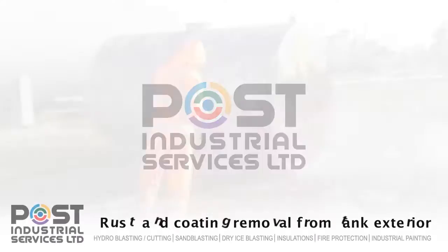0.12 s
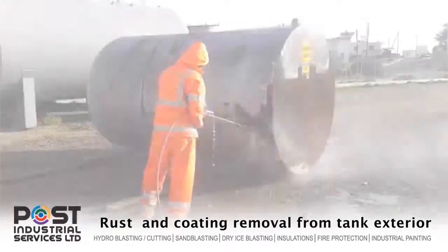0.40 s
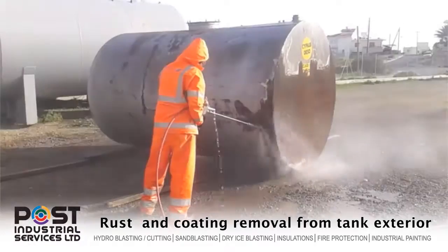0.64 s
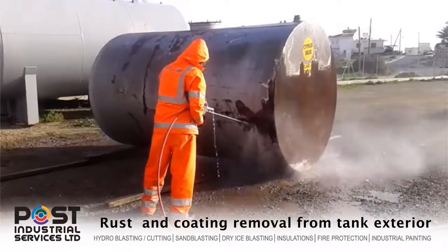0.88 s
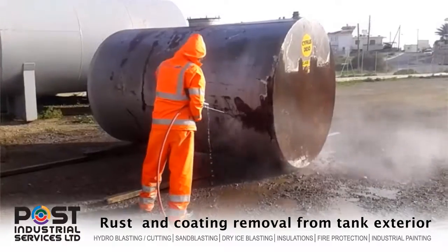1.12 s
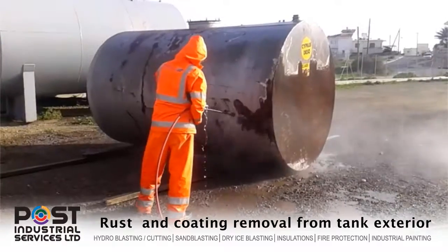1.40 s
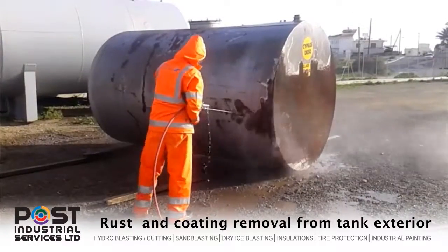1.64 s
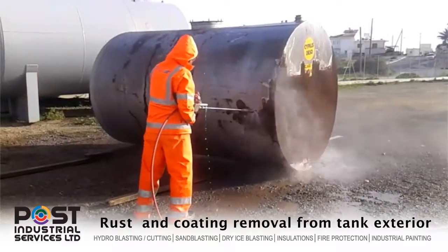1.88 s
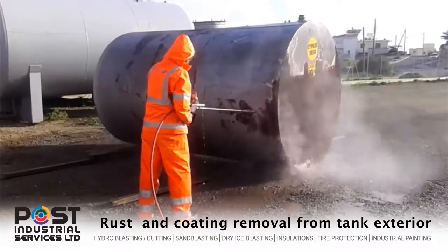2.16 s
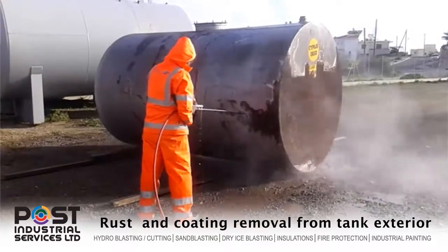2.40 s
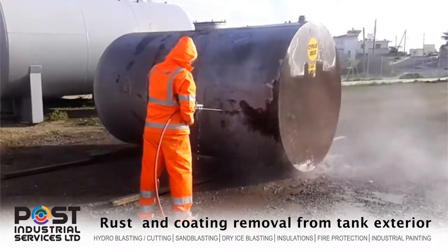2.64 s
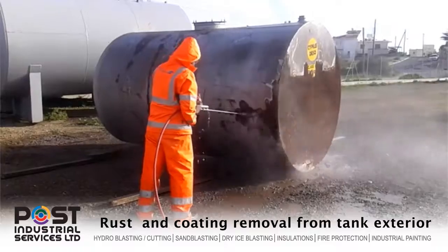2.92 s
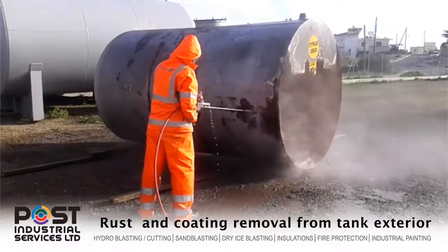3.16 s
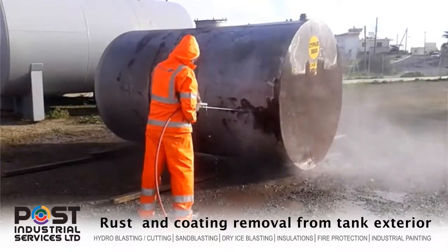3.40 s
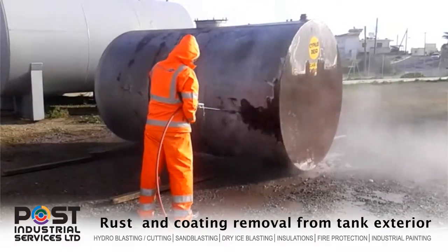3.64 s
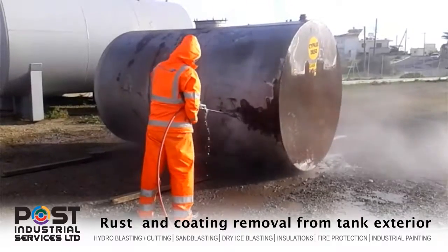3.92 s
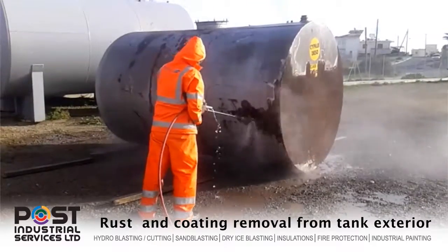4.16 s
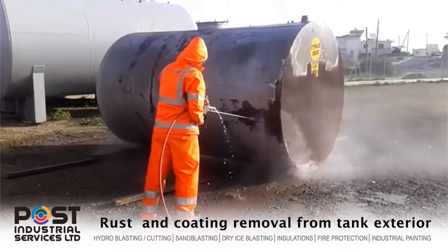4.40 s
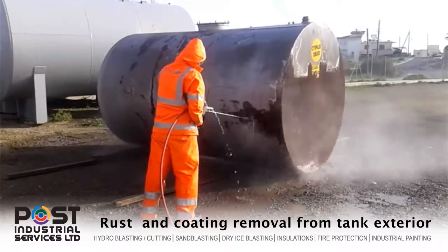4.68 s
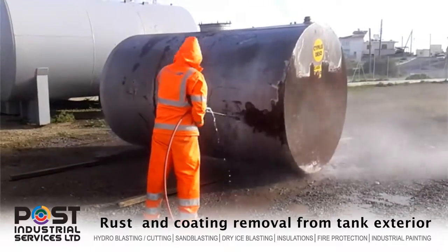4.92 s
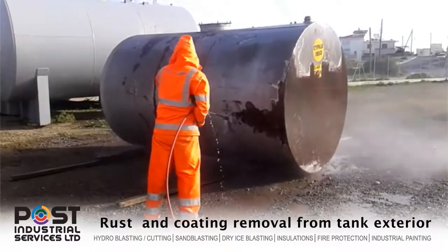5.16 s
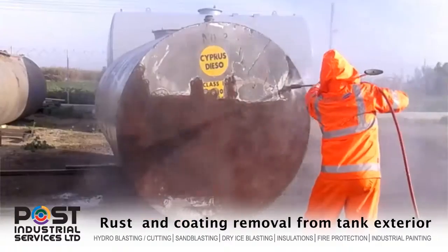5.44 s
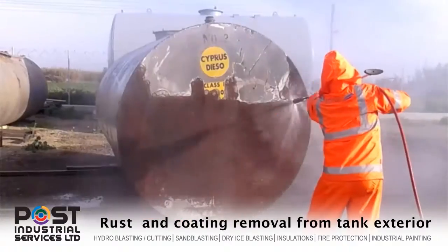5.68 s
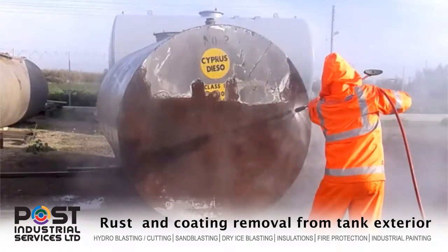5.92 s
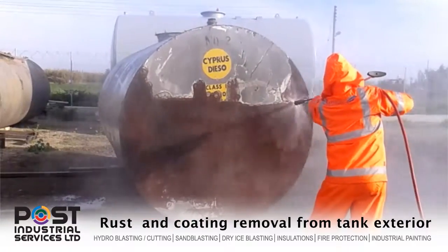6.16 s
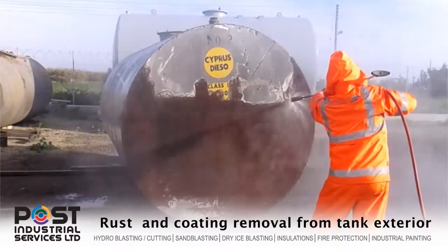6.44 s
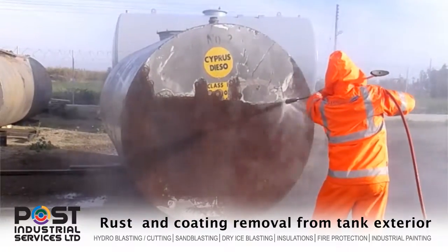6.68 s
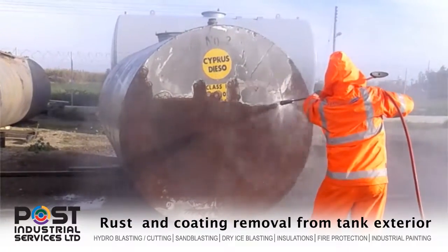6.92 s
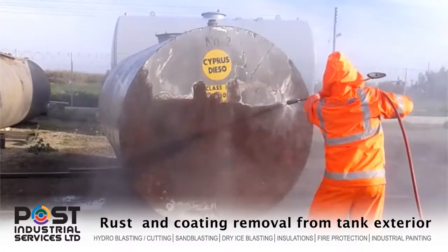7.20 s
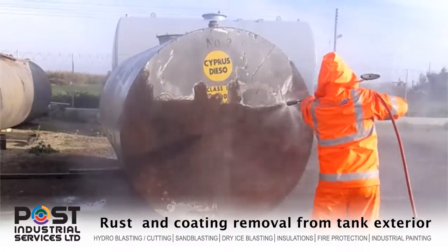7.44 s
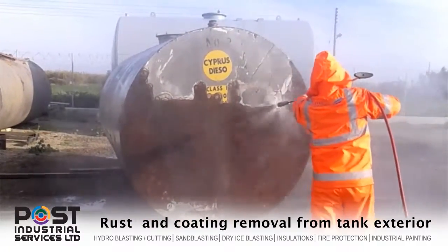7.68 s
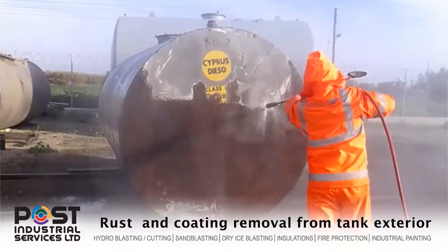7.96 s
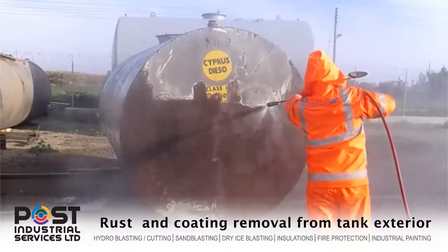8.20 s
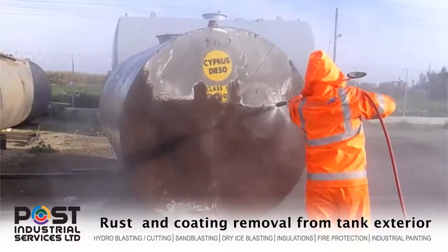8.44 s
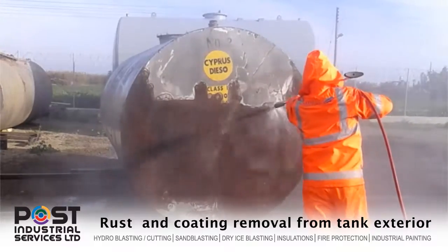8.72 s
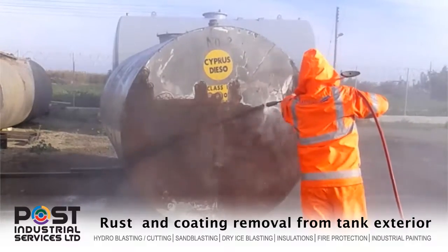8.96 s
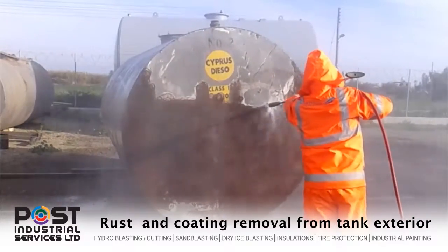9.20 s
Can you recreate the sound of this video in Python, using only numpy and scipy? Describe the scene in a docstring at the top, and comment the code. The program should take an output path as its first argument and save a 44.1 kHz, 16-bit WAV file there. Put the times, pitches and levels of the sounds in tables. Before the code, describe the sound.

After brief silence, a high-pressure water jet fades in, hissing and fluttering against a hollow steel tank, then cuts to a closer, brighter steady blast.

```python
"""After a short silence a water jet from a spinning nozzle fades in, stripping a hollow steel tank outdoors.
Filtered noise makes the hiss, drumming, roar and spray; all throb at the turning rate and wall modes ring.
A distant pump engine hums in harmonics alongside, and a decaying sine thuds on the shell.
After a short gap a second standpoint follows, with another thud at its start and a faint ground echo
that ripples the colour. Both channels are alike."""
import sys
import numpy as np
from scipy import signal
from scipy.fft import rfft, irfft, next_fast_len
from scipy.io import wavfile
from scipy.ndimage import map_coordinates

SR = 44100
rng = np.random.default_rng(int(sys.argv[2]) if len(sys.argv) > 2 else 0)


def store_wav(level_fs):
    """Save 16-bit WAV to argv[1]."""
    pcm = np.round(np.clip(np.atleast_2d(level_fs), -1, 1) * 32767)
    wavfile.write(sys.argv[1], SR, pcm.T.astype(np.int16))


def attenuation_scalar(level_db):
    """Turn a level in dB into a linear amplitude multiplier (20 dB per decade)."""
    decades = np.asarray(level_db, float) / 20
    return 10 ** decades


N = 411453


def in_time(rows, t):
    """Linear interpolation: the columns of a table joined by straight lines in time."""
    s, *columns = np.transpose(rows)
    return [np.interp(t, s, c) for c in columns]


def at_hz(points, hz):
    """Logarithmic pitch scale: a spectrum interpolated over log frequency."""
    f, value = np.transpose(points)
    return np.interp(np.log(hz), np.log(f), value)


def drift(rate_hz, size):
    """Low-passed random process: coarse noise through a double one-pole filter, scaled to spread 1."""
    step = 40   # samples between coarse points
    settling = 2000   # coarse points discarded while the filter settles
    r = np.exp(-2 * np.pi * rate_hz * step / SR)
    coarse = rng.standard_normal(size // step + settling + 2)
    slow = signal.lfilter([1], [1, -2 * r, r * r], coarse)[settling:]
    return np.interp(np.arange(size) / step, np.arange(len(slow)), slow / slow.std())


def throb(turns, second, lag):
    """Periodic modulation: one hump for the turn and a smaller second harmonic for the opposite jet."""
    return np.cos(2 * np.pi * turns - lag) + second * np.cos(4 * np.pi * turns - 2 * lag)


# Borders between the seven layers of the jet sound, rising: f/Hz
LAYER_EDGES_HZ = [110, 500, 1400, 2850, 4500, 9000]


def throbbing_layers(noise, hz, turns, size, depth, second, surge_db, near_db, own_db):
    """Amplitude-modulated turbulence: third-octave noise bands throb and flicker, then sum into layers."""
    length = len(turns)
    grip = 1 + 0.28 * drift(1.9, length)   # the depth of the throb wavers slowly
    surge, near = drift(21.0, length), drift(14.0, length)
    layers = np.zeros((len(LAYER_EDGES_HZ) + 1, length))
    for centre_hz in 25 * 2 ** (np.arange(29) / 3):
        away = np.clip(3 * np.log2(hz / centre_hz), -1, 1)   # third octaves from the centre
        band = irfft(noise * np.cos(np.pi / 2 * away) ** 2, size)[:length]
        near = 0.73 * near + 0.31 * drift(27.0, length)   # neighbouring bands flicker partly alike
        lag = 0.88 * drift(0.78, length)   # each band peaks at its own angle of the nozzle
        swing_db = at_hz(depth, centre_hz) * grip * throb(turns, second, lag)
        swing_db += surge_db * surge + near_db * near + own_db * drift(46.0, length)
        layers[np.searchsorted(LAYER_EDGES_HZ, centre_hz)] += band * attenuation_scalar(swing_db)
    return layers


def ring_wall(layers, noise, hz, turns, size, ring, levels_db, shares, ring_swing_db, ring_follows):
    """Modal resonance: narrow bands of the driving noise are raised; each mode favours its own jet angle."""
    length = len(turns)
    for ring_hz, width_hz, lift_db in ring:
        mode = irfft(noise * np.exp(-2 * ((hz - ring_hz) / width_hz) ** 2), size)[:length]
        angle = 2 * np.pi * (turns + rng.random()) + drift(0.85, length)
        gain_db = lift_db + ring_swing_db * np.cos(angle)
        gain_db += 0.51 * drift(2.0, length) + 0.71 * drift(22.0, length)
        layer = np.searchsorted(LAYER_EDGES_HZ, ring_hz)
        # the harder driven, the more it rings
        gain_db += ring_follows * (levels_db[layer] - shares[layer][0])
        layers[layer] += mode * (attenuation_scalar(gain_db) - 1)


def layer_levels(sweep, shares, t):
    """Linear superposition in dB: each layer follows the bite and the splash by its own shares."""
    bite_db, splash_db = in_time(sweep, t)
    return [db + by_bite * bite_db + by_splash * splash_db for db, by_bite, by_splash in shares]


def with_echoes(x, turns, echoes):
    """Comb interference: path lengths change as the jet circles and the lance moves, so the comb slides."""
    at, out = np.arange(len(x)), x.copy()
    for lag_s, db, sweep_s, wander_s in echoes:
        angle = 2 * np.pi * (turns + rng.random())
        late = lag_s + sweep_s * np.cos(angle) + wander_s * drift(0.95, len(x))
        out += attenuation_scalar(db) * map_coordinates(x, [at - late * SR], order=3, mode="mirror")
    # scaled for the summed power of all paths
    return out / np.sqrt(1 + sum(attenuation_scalar(2 * row[1]) for row in echoes))


def blast(span_s, sweep, shares, colour, spin, depth, ring, echoes,
          ring_swing_db, second, surge_db, near_db, own_db, ring_follows):
    """Broadband turbulence of a jet on steel: coloured noise, modulated by rotation and by wall resonance."""
    start, stop = round(span_s[0] * SR), min(round(span_s[1] * SR), N)
    t, size = np.arange(start, stop) / SR, next_fast_len(stop - start)
    hz = np.maximum(np.arange(size // 2 + 1) * SR / size, 1)
    noise = rfft(rng.standard_normal(size)) * attenuation_scalar(at_hz(colour, hz))
    turns_per_s, = in_time(spin, t)
    turns = np.cumsum(turns_per_s) / SR
    layers = throbbing_layers(noise, hz, turns, size, depth, second, surge_db, near_db, own_db)
    levels_db = layer_levels(sweep, shares, t)
    ring_wall(layers, noise, hz, turns, size, ring, levels_db, shares, ring_swing_db, ring_follows)
    direct = sum(attenuation_scalar(db) * x / x.std() for db, x in zip(levels_db, layers))
    out = np.zeros(N)
    out[start:stop] = with_echoes(direct, turns, echoes)
    return out


SIDE_START_S = .7975
# Noise colour, relative within each layer: f/Hz, spectral level/(dB per Hz)
SIDE_COLOUR = [(20, -50), (60, -8.5), (135, -7), (622, -4), (760, -1), (1040, -4.5), (2300, -5),
               (2880, -10.5), (3860, -0.5), (4930, -6.5), (5650, -3), (8900, -3), (11500, -12.5),
               (14400, -19.5), (15800, -22)]
# Nozzle speed: t/s, rate/(turns per s)
SIDE_SPIN = [(.8, 12.3), (1.5, 12.8), (2.2, 19), (2.6, 22.8), (3.0, 19.6), (3.5, 17), (4.0, 12),
             (4.5, 14.3), (5.4, 12.5)]
# Throb depth, before its slow waver: f/Hz, swing/dB
SIDE_THROB = [(100, 2), (800, 1.94), (3000, 1.2), (6000, 1.64), (12000, 1.3)]
# Ringing modes of the steel wall, lift before modulation: f/Hz, width/Hz, lift/dB
SIDE_RING = [(1254, 190, 3), (2170, 300, 1.5), (4140, 480, 1), (4400, 270, 2), (5500, 320, 1),
             (6060, 170, 1.5), (6800, 210, 2.5), (7100, 240, 0.5), (7720, 150, 2), (8020, 250, 2.5),
             (8570, 230, 2.5), (9170, 140, 2.5), (9970, 250, 1.5), (10500, 340, 3.5), (13300, 600, 2)]
# Lance swept to and fro: t/s, bite into the steel/dB, splash thrown towards the listener/dB
SIDE_SWEEP = [(.8, -1.5, 0), (1.85, -2.5, 0.5), (2.15, 5.5, 2), (2.5, 5.5, 1), (2.75, 3.5, -0.2),
              (3.0, -2, 1.2), (3.25, -2, 2.3), (3.55, -0.5, 0), (3.85, 4.5, 0.5), (4.1, -2, -0.2),
              (4.4, -3.5, -1), (4.62, -6.5, 0.5), (4.95, -2.5, -3), (5.39, 1.5, -1.3)]
# Deep rumble, shell drumming, low roar, splash, valley, jet hiss, fine spray, before the sweep:
# level/dB, share of the bite/1, share of the splash/1
SIDE_LAYERS = [(-63, .9, -.2), (-49, 1.14, .1), (-41.5, 0.19, 0.92), (-39, 0.043, 0.44),
               (-36.5, 0.087, 0.4), (-27, 0.3, -0.013), (-34, 0.37, -0.014)]


def side_jet():
    """Direct sound alone: the jet at the first standpoint, with no reflected path."""
    return blast((SIDE_START_S, 5.3905), SIDE_SWEEP, SIDE_LAYERS, SIDE_COLOUR, SIDE_SPIN, SIDE_THROB,
                 SIDE_RING, echoes=[], ring_swing_db=0.5, second=0.71, surge_db=0.43, near_db=0.76,
                 own_db=1.5, ring_follows=0.36)


# Distant pump engine, before flicker and the standpoint's gain: multiple of the cycle/1, rms level/dB
ENGINE_ORDERS = [(3, -86), (6, -70), (9, -77), (11, -79), (12, -66.5), (13, -66), (15, -69), (18, -74),
                 (21, -74), (23, -74)]


def engine():
    """Harmonic series: sine orders share one slightly wavering speed, and each flickers alone."""
    cycle_hz, waver, flicker_db = 10.47, .003, 2.5
    cycles = np.cumsum(cycle_hz * (1 + waver * drift(.6, N))) / SR
    hum = np.zeros(N)
    for multiple, db in ENGINE_ORDERS:
        peak = np.sqrt(2) * attenuation_scalar(db + flicker_db * drift(1.5, N))
        hum += peak * np.sin(2 * np.pi * (multiple * cycles + rng.random()))
    return hum


# Slugs of water striking the shell: t/s, starting level/dB, f/Hz
THUDS = [(3.913, -25, 190.3), (5.4765, -23, 250)]


def thuds():
    """Damped free vibration: a soft blow rings the shell as a briefly decaying sine."""
    t60_s = 0.026
    out = np.zeros(N)
    for s, db, hz in THUDS:
        t = np.maximum(np.arange(N) / SR - s, 0)
        out += attenuation_scalar(db - 60 * t / t60_s) * np.sin(2 * np.pi * hz * t)
    return out


# Noise colour, relative within each layer: f/Hz, spectral level/(dB per Hz)
FRONT_COLOUR = [(20, -45), (60, -16.5), (135, -9.5), (413, -6.5), (1600, -8.5), (2100, -6.5), (2600, -8.5),
                (3500, -7.5), (4700, -0.5), (6000, 1), (8050, -0.5), (9220, -4.5), (10600, -5.5),
                (12300, -13.5), (15800, -15)]
# Nozzle speed: t/s, rate/(turns per s)
FRONT_SPIN = [(5.4, 19), (6.4, 20.8), (7.0, 17.5), (8.2, 17.3), (9.33, 18.7)]
# Throb depth, before its slow waver: f/Hz, swing/dB
FRONT_THROB = [(100, 3.7), (800, 1.8), (2500, 1.6), (4500, 1.9), (8000, 1.4), (12000, 0.33)]
# Echo off the ground: delay/s, level/dB, sweep by the turning nozzle/s, slow wander/s
FRONT_ECHOES = [(.0022, -31, 0.000023, .00001)]
# Ringing modes of the steel wall, lift before modulation: f/Hz, width/Hz, lift/dB
FRONT_RING = [(2030, 100, 1.1), (4700, 140, 1.8), (5110, 280, 1.8), (5400, 230, 3), (5950, 230, 2.5),
              (6640, 430, 2.5), (7040, 130, 1.5), (7500, 110, 3.7), (7920, 290, 3.6), (8480, 91, 3.3),
              (8920, 180, 2.1), (10650, 250, 0.99)]
# Lance swept to and fro: t/s, bite into the steel/dB, splash thrown towards the listener/dB
FRONT_SWEEP = [(5.44, 5.5, 1.46), (5.7, 2, 1.8), (6.1, -4, 1.1), (6.5, -1.2, -0.59), (6.9, 1.2, 0.43),
               (7.25, 1.5, -.3), (7.5, -0.3, -0.74), (7.8, 0.8, -0.51), (8.25, 2.5, .5), (8.7, 1, -1.3),
               (9.0, 0.5, 1.7), (9.33, 0, 0.35)]
# Deep rumble, shell drumming, low roar, splash, valley, jet hiss, fine spray, before the sweep:
# level/dB, share of the bite/1, share of the splash/1
FRONT_LAYERS = [(-56, .2, -.3), (-43.5, 0.66, -0.4), (-38.5, .1, 0.12), (-37.5, .05, .99), (-37, 0.75, .05),
                (-25.3, 0.057, -.1), (-32.5, 0.17, -0.44)]


def front_jet():
    """Direct sound plus ground reflection: the jet at the second standpoint, faintly comb-filtered."""
    return blast((5.4358, 9.34), FRONT_SWEEP, FRONT_LAYERS, FRONT_COLOUR, FRONT_SPIN, FRONT_THROB,
                 FRONT_RING, FRONT_ECHOES, ring_swing_db=1.5, second=0.17, surge_db=0.6, near_db=-0.4,
                 own_db=1.07, ring_follows=1.2)


def scene():
    """Superposition: two standpoints in turn, engine and thuds added, alike in both channels."""
    side = side_jet()
    hum = engine()
    front = front_jet()
    # the engine is heard only while a standpoint sounds
    side += hum * (side != 0)
    front += attenuation_scalar(1.5) * hum * (front != 0)
    return np.tile(side + front + thuds(), (2, 1))


def band_limit(x):
    """A steep low-pass at the top of the band."""
    return signal.sosfilt(signal.butter(12, 16940, fs=SR, output="sos"), x)


def record(dry):
    """Saturation and band-limiting: the input stage flattens peaks, the start fades in, bass and top are cut."""
    clip_top, low_cut_hz, top_cut_hz = .108, 32, 15740
    flat = dry / (1 + (dry / clip_top) ** 4) ** (1 / 4)
    flat = signal.sosfilt(signal.butter(2, low_cut_hz, "high", fs=SR, output="sos"), flat)
    # the first standpoint fades in evenly in dB
    fade_db = np.interp(np.arange(N) / SR, [SIDE_START_S, 1.82], [-21, 0])
    faded = flat * attenuation_scalar(fade_db)
    mix = signal.sosfilt(signal.ellip(12, .3, 70, top_cut_hz, fs=SR, output="sos"), faded)
    return band_limit(mix)


dry = scene()
out = record(dry)
store_wav(out)
```